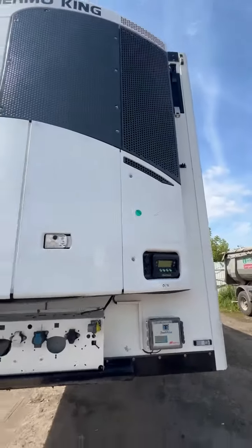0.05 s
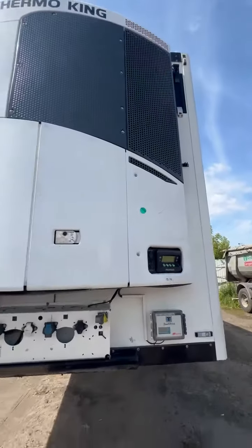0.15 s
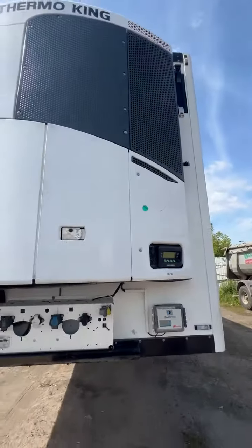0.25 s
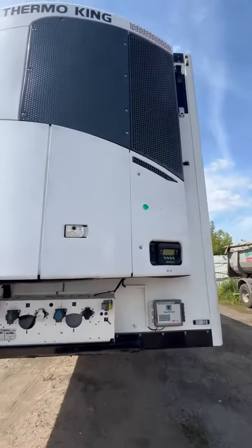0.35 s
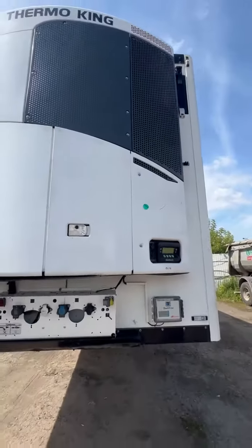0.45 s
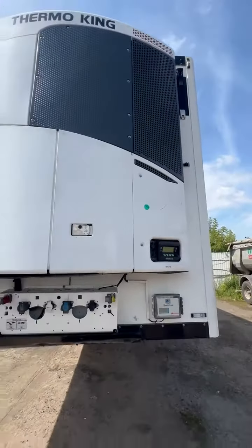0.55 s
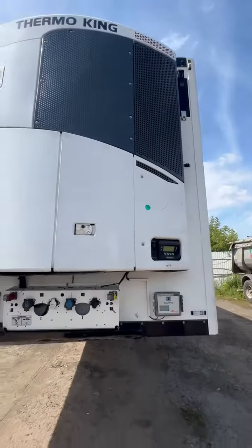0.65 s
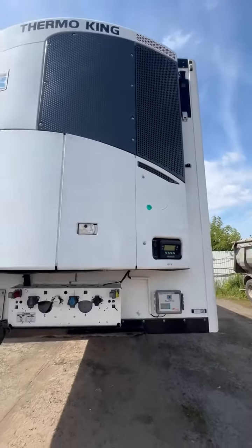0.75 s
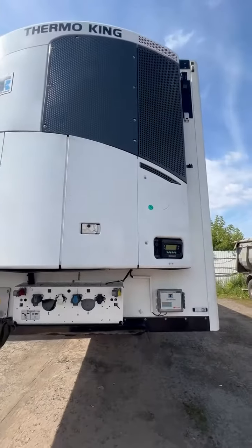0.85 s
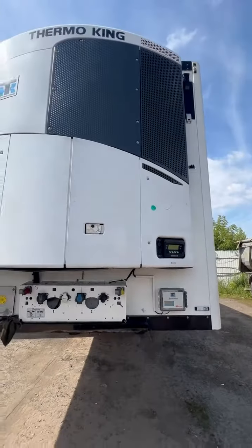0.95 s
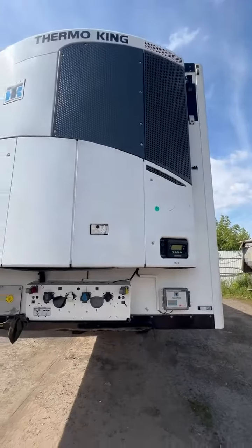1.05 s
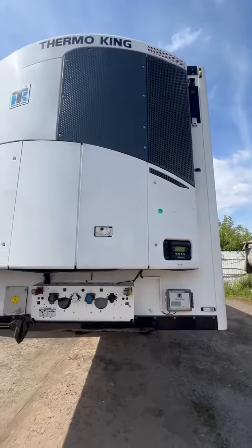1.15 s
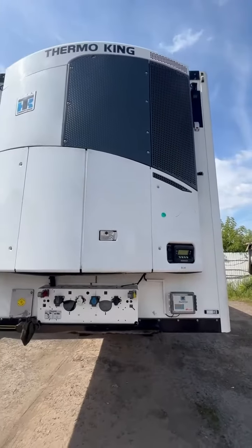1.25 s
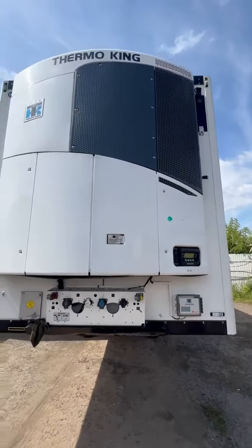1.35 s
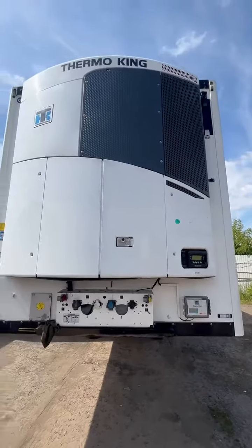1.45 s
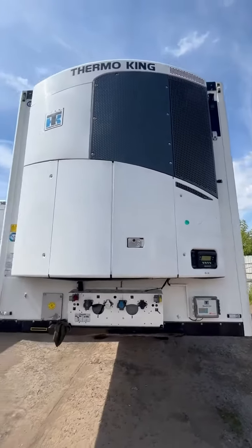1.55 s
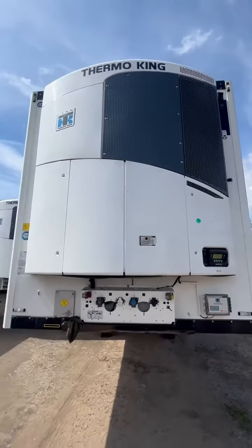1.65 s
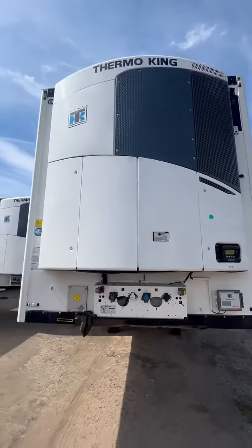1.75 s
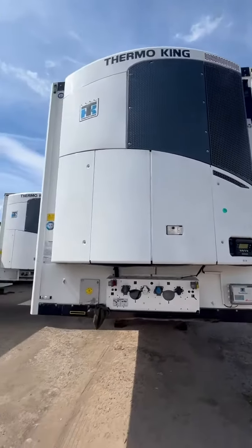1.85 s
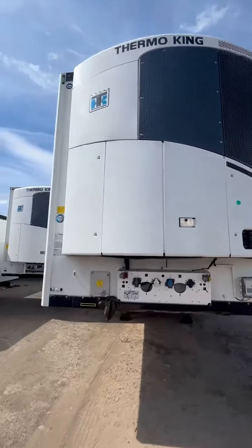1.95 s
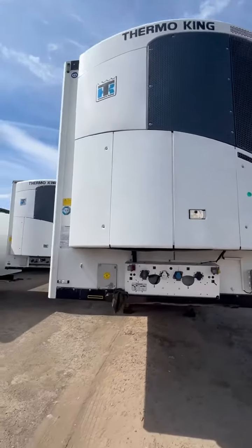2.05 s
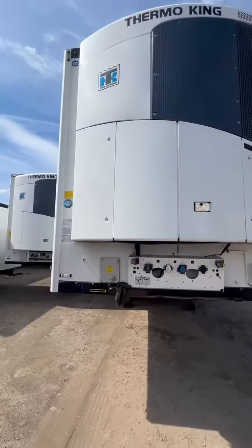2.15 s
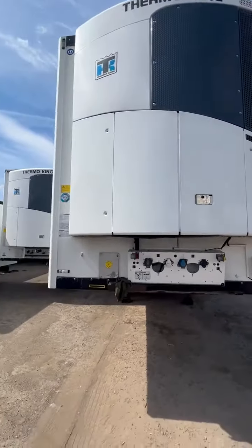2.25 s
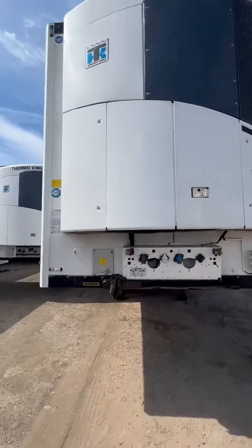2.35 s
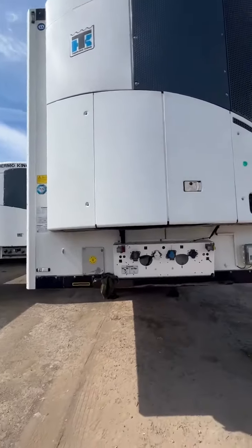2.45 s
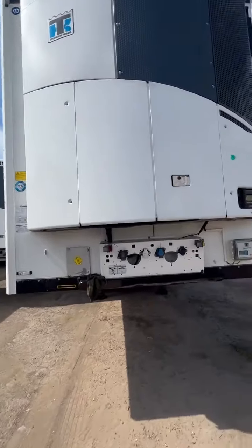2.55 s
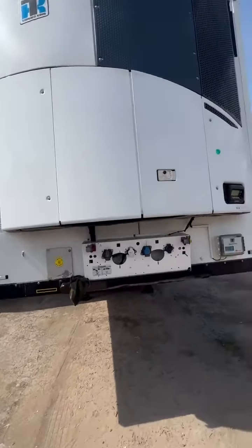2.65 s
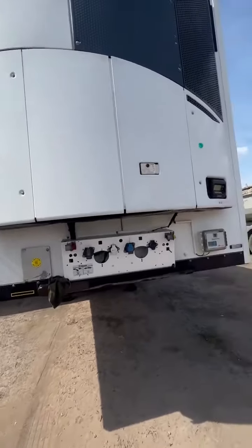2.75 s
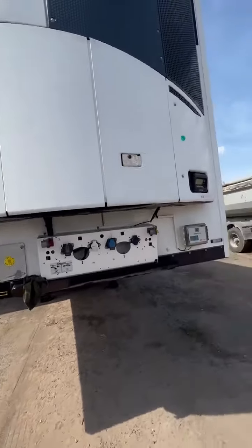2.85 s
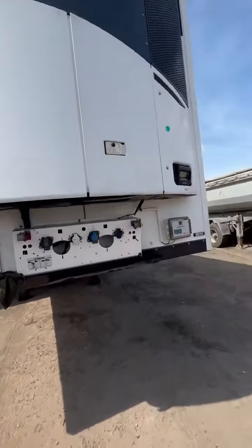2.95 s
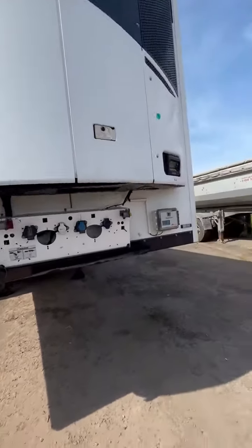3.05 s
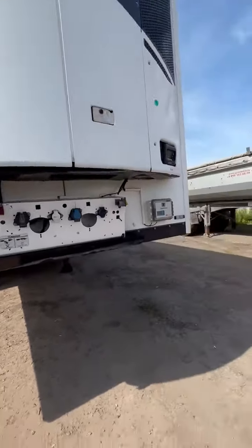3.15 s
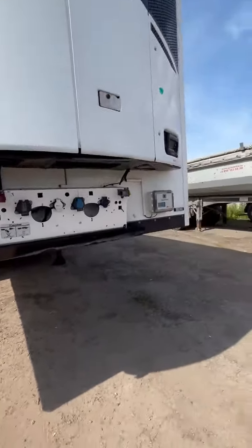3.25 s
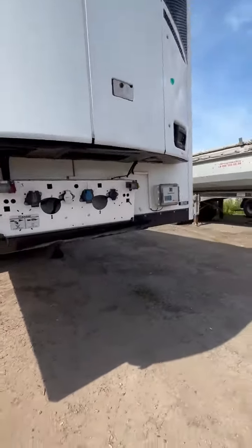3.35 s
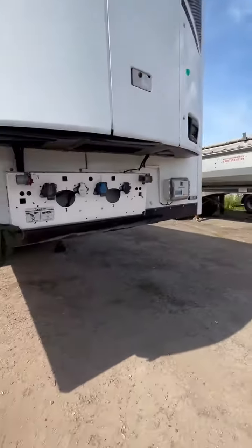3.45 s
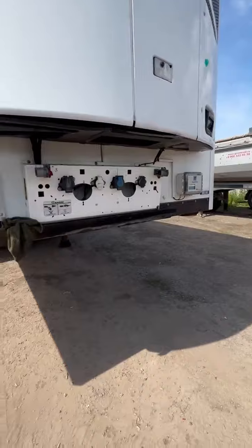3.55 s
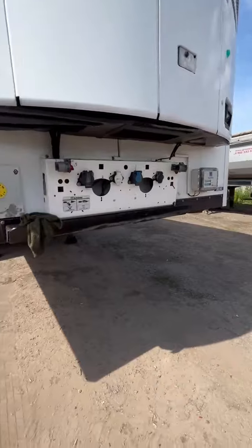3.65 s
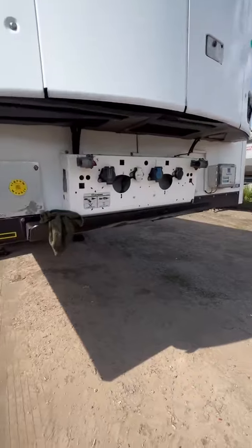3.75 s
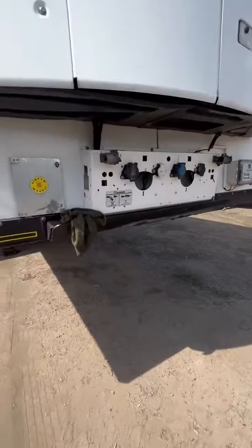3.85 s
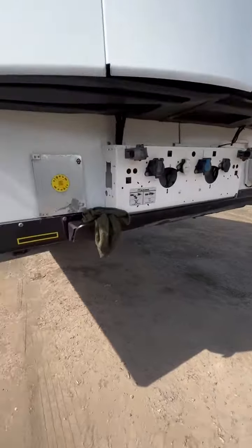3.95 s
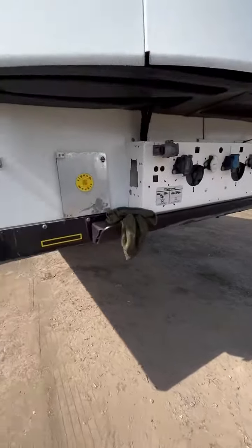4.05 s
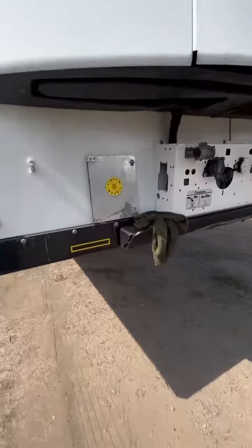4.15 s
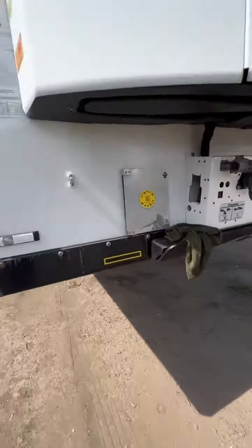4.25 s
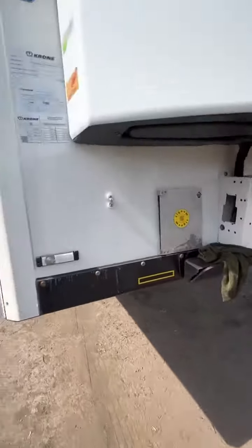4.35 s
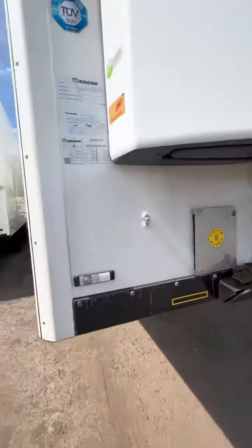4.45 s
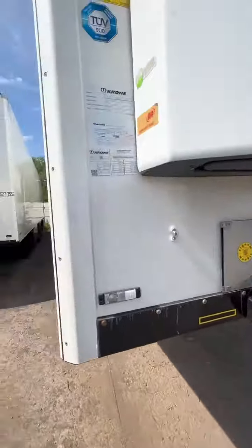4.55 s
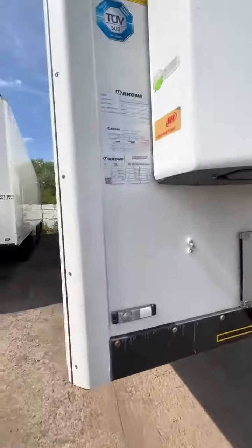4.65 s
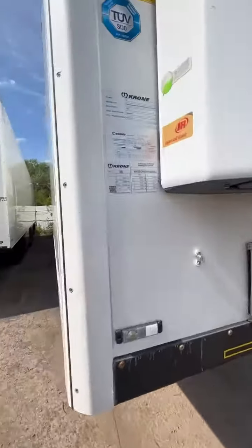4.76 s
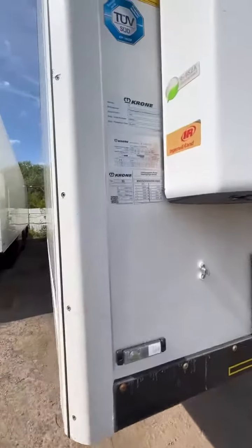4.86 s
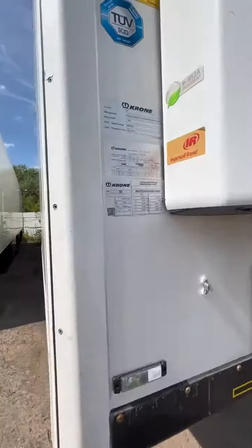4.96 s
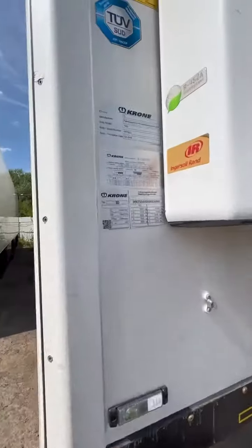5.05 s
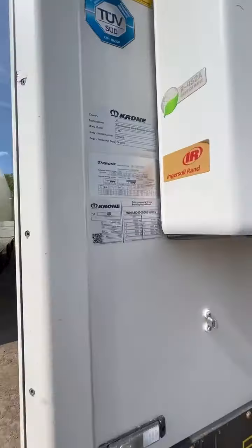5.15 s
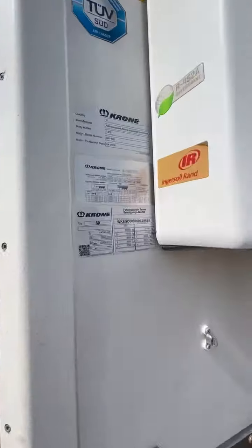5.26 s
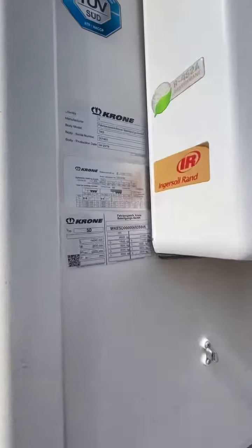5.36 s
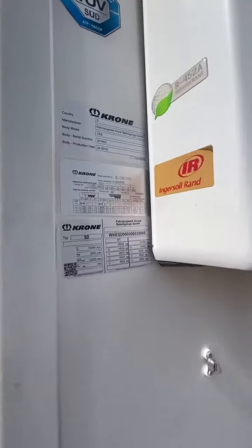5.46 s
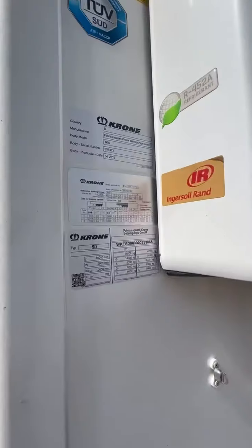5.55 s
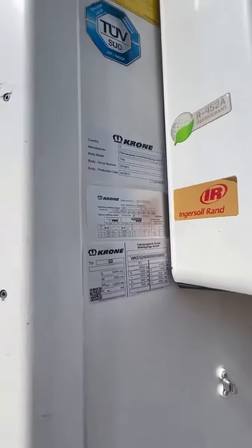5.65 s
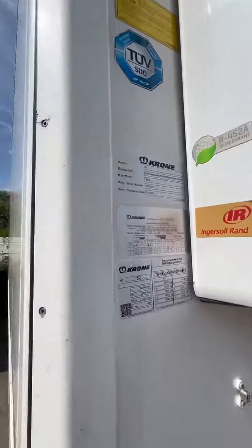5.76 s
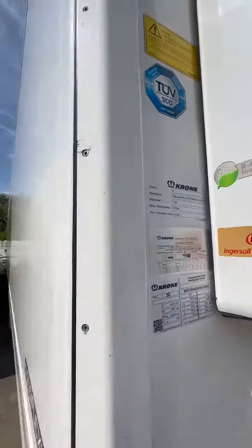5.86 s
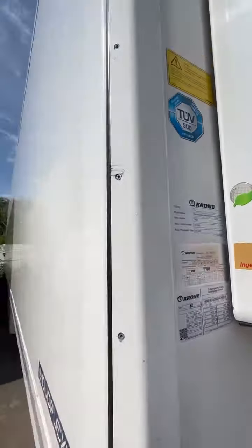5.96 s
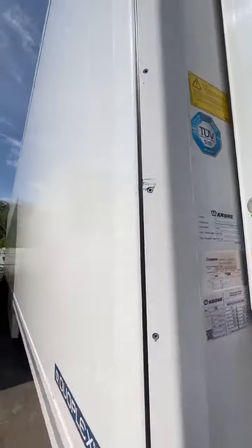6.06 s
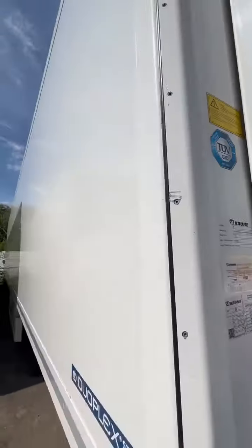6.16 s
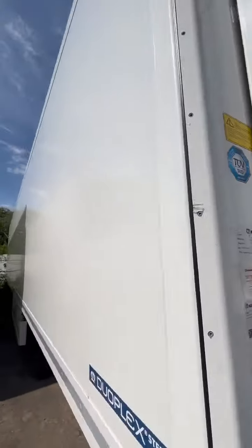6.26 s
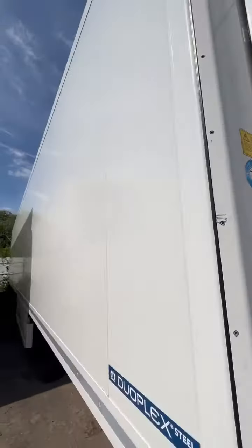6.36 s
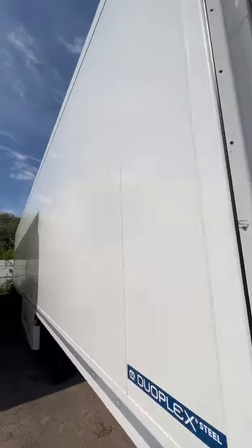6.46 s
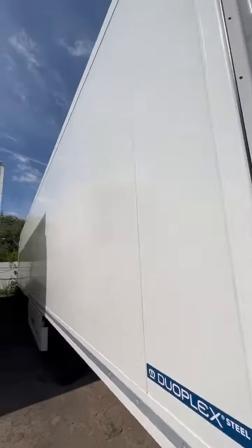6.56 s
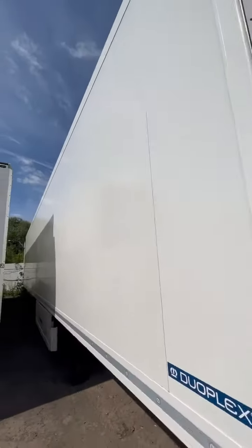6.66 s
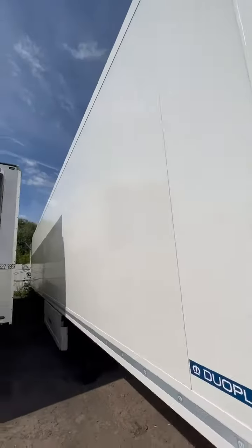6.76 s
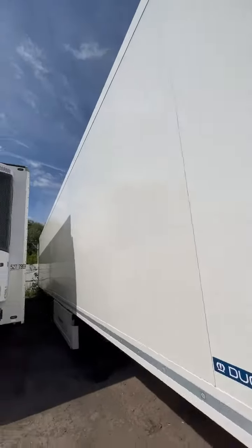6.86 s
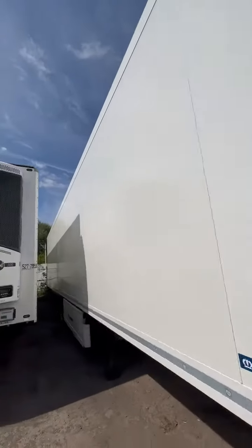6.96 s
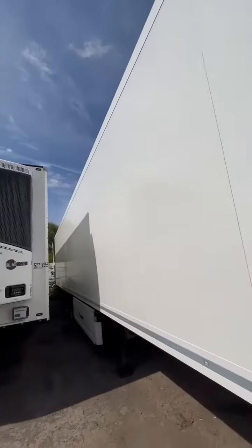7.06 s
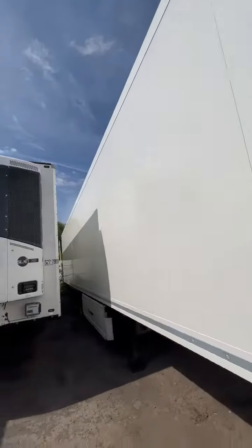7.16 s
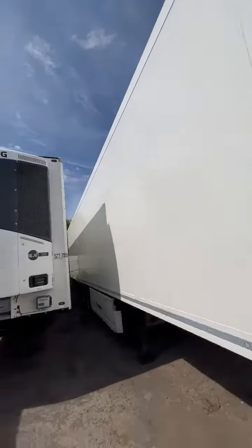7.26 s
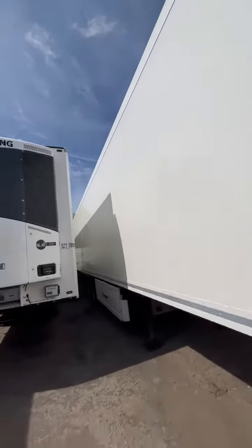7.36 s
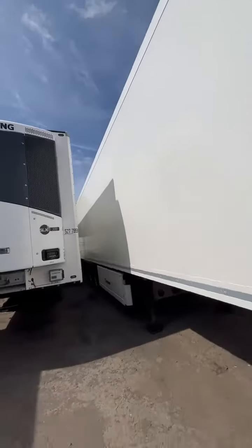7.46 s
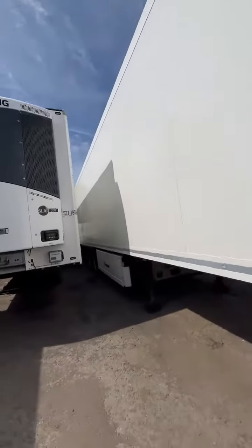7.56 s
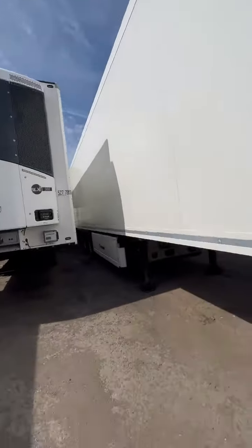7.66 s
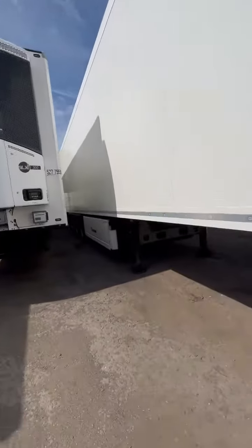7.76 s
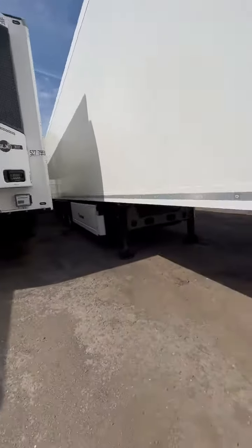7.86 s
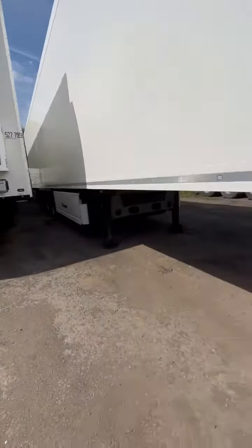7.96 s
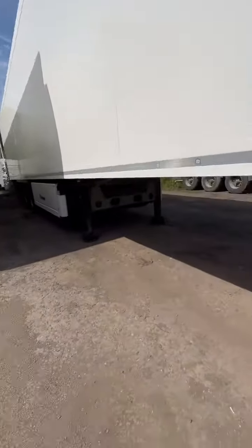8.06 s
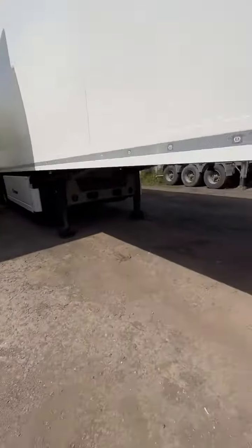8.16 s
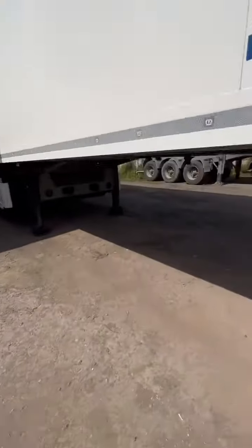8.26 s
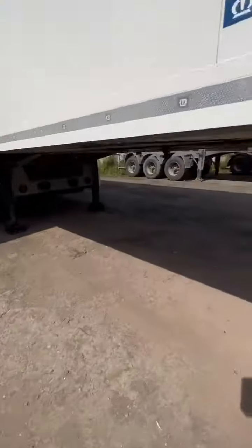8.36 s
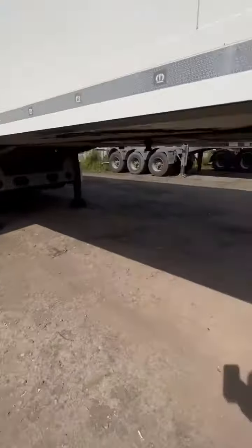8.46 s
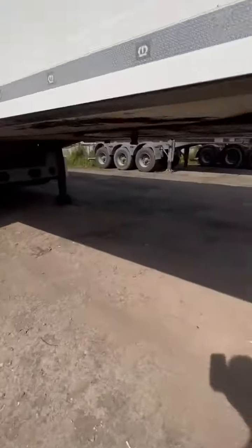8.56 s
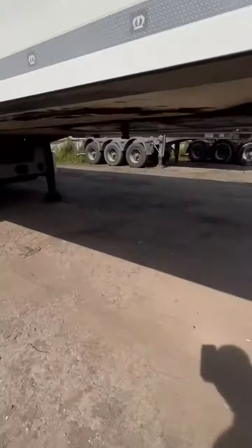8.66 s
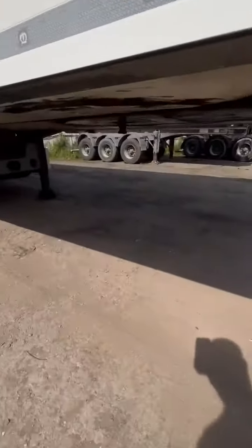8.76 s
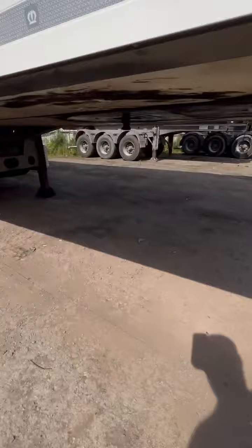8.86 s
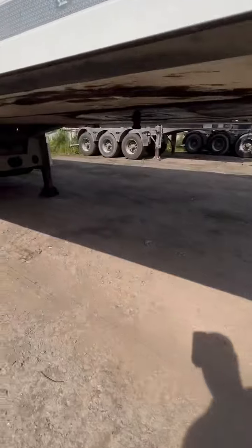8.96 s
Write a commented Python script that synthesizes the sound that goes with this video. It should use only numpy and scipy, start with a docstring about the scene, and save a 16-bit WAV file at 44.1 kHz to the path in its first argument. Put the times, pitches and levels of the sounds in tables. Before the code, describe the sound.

A small four-cylinder diesel runs continuously at constant speed, its low hum mixed with fast mechanical rattle, wavering fan tones and broad air noise. The walking listener comes close, hears it swell and buzz, then rounds the trailer's corner, where clatter and hiss fade into a muffled drone. Soft low wind puffs brush the close stereo microphone; sparse grit clicks come near the end.

```python
"""A gravel lot, walking up to a trailer refrigeration unit and then round the corner of the trailer.
Its four-cylinder diesel drones in sine orders of the firing rate; clatter and piston slaps are
noise that repeats with the engine cycle; fans add wavering tones and a filtered rush of air.
The corner shades the treble. A light breeze brushes the microphone as low noise, opposite
at its two ports, and grit ticks underfoot as short noise bursts."""
import sys
import numpy as np
from scipy import signal
from scipy.fft import rfft, irfft, next_fast_len
from scipy.io import wavfile
from scipy.ndimage import uniform_filter1d

SR = 44100
rng = np.random.default_rng(int(sys.argv[2]) if len(sys.argv) > 2 else 0)


def generate_wav(sig):
    """Save sig (samples, or channels by samples) to the path in sys.argv[1] as 16-bit PCM at SR."""
    pcm = np.round(np.clip(np.atleast_2d(sig).T, -1, 1) * 32767).astype(np.int16)
    wavfile.write(sys.argv[1], SR, pcm)


N = 397782
TIME = np.arange(N) / SR
EDGE_HZ = 11700  # top of the recorded band

# firing rate, nearly steady; the walk towards the unit and away bends it a little:
# (time [s], firings per second [Hz])
FIRING_RATE = [(0, 49.46), (1.8, 49.5), (3.0, 49.62), (4.5, 49.55), (5.1, 49.6), (5.8, 49.45), (6.8, 49.47),
               (7.8, 49.58), (9, 49.6)]
# boom of the housing along the walk, highest right beside the unit; used relative to its top, median
# or start: (time [s], level [dB])
BOOM_ALONG_WALK = [(0, -29.5), (0.8, -30.5), (1.7, -30.5), (2.9, -29), (3.8, -25), (4.4, -24), (4.9, -23.5),
                   (5.35, -20.5), (5.8, -22.5), (6.5, -27.5), (7, -30.5), (7.7, -34), (8.4, -34),
                   (9, -32.5)]
# treble, which needs a line of sight to the grille and is lost round the corner; used relative like
# the boom: (time [s], level [dB])
TREBLE_ALONG_WALK = [(0, -37), (1.5, -37), (2.4, -35.5), (3.1, -32.5), (4.4, -34.5), (5.65, -34),
                     (6.3, -39.5), (7.1, -46), (7.7, -49), (8.5, -47.5), (9, -48)]
# the unit is ahead on the left, narrows as the microphone passes the corner, then lies behind:
# (time [s], left-right difference [dB], share behind [0-1], width [dB])
UNIT_BEARING = [(0, 4, 0, 2), (3, 3.5, 0.14, -1), (5.6, 3, 0.5, -2), (6.2, 2.5, 0.06, -8),
                (6.65, 2, 0.2, -14), (7.1, 0, 0.8, -6), (7.5, 0.5, 1, 5.5), (9, 0.5, 0.96, 2)]


def drone(firings, level_db=0, unsteady_db=-0.05, even_lean=0.09, lean=0.19, pipe_lag=0.04):
    """Deep, clean exhaust orders from slightly uneven combustion; higher ones lean towards the unit."""
    # multiples of the firing rate: order [firings]
    exhaust_orders = (1, 2, 3, 4, 5, 6, 7, 9)
    # one row per order: (level beside the unit [dB], following [dB per dB of boom])
    exhaust_levels = [(-24, 0.57), (-13, 0.78), (-23, 0.79), (-22, 1.13), (-25.5, 1.45), (-24, 1.35),
                      (-28, 1.5), (-29, 1.5)]
    boom_db = below_top(BOOM_ALONG_WALK, TIME)
    side_db = leftward(TIME)
    out = np.zeros((2, N))
    for k, (db, following) in zip(exhaust_orders, exhaust_levels):
        order_db = level_db + db + following * boom_db + unsteady_db * drift(33)
        strength = standing(k) * gain_of(order_db)
        # dB each way per dB of left-right difference
        tilt = gain_of(side_db * (even_lean + lean * (k / exhaust_orders[-1]) ** 2))
        # the orders leave as one stroke; the silencer holds higher ones back (lag in firings per order)
        wave = np.sin(2 * np.pi * k * (firings - pipe_lag * k))
        out += np.array([tilt, 1 / tilt]) * strength * wave
    return np.sqrt(2) * out


def rush(firings, level_db=-34.0, knocking=0.63, patchy_db=1.65, flicker_db=1.17, flicker_hz=5500):
    """Valves and injectors repeat a clatter every four firings; fan air and combustion add fresh noise."""
    # engine and fans together, relative: (frequency [Hz], level [dB per Hz])
    rush_spectrum = [(290, -17), (500, -1), (610, -5.5), (730, -7.5), (980, -10.5), (1130, -8.5),
                     (1400, -14), (1620, -9.5), (1850, -9), (2300, -11.5), (2900, -13), (3350, -16),
                     (3650, -22), (4200, -21.5), (5200, -25.5), (5900, -22.5), (8000, -29), (9400, -31),
                     (11500, -38)]
    # part that repeats with each engine cycle: (frequency [Hz], share [0-1])
    repeating_share = [(600, 0.34), (1100, 0.62), (1900, 0.56), (3000, 0.52), (4500, 0.32), (9000, 0.44)]
    # air hiss, strongest just below the housing, relative to its top: (time [s], level [dB])
    hiss_along_walk = [(0, -46), (1.3, -46.5), (3.3, -44.5), (4.15, -43), (4.4, -47), (5.7, -47),
                       (6.4, -48.5), (7.1, -54.5), (7.7, -59), (9, -59.5)]
    # how far each range follows the walk:
    # (frequency [Hz], by boom [dB per dB], by treble [dB per dB], by hiss [dB per dB])
    range_following = [(450, 1, -0.5, 1), (734, 0.82, 0.66, -0.5), (1150, -0.09, 0.96, 0),
                       (1680, -0.2, 1.1, 0), (2160, 0.38, 0.86, -0.3), (3100, -0.1, 1.0, 0),
                       (4020, 0, 0.15, 0.52), (5840, 0, 0, 1.34), (11200, 0.72, 0, 0.5)]
    knock = knocks(firings)
    clatter = knock * cycling(firings)
    air = rng.standard_normal((2, N)) * evened(1 + knocking * (knock - 1))
    hz, t, (clatter, air) = spectra(scatter(np.array([clatter, air])))

    # eddies make the air uneven in patches, and its top flickers
    patches = uniform_filter1d(rng.standard_normal(air.shape[1:]), size=40, axis=0)
    patches = evened(uniform_filter1d(patches, size=6, axis=1))
    flicker = hz / flicker_hz * np.interp(t, TIME, drift(16))
    air = air * gain_of(patchy_db * patches + flicker_db * flicker)

    share = np.clip(across(repeating_share, hz)[0], 0, 1)
    mixed = np.sqrt(share) * clatter + np.sqrt(1 - share) * air
    mixed = mixed * gain_of(across(rush_spectrum, hz)[0])

    # distance and the corner change each range by its own amount; its mean power stays the same
    by_boom, by_treble, by_hiss = across(range_following, hz)
    reach_db = by_boom * below_top(BOOM_ALONG_WALK, t) + by_treble * below_top(TREBLE_ALONG_WALK, t)
    reach = gain_of(reach_db + by_hiss * below_top(hiss_along_walk, t))
    reach = reach / np.sqrt(np.mean(reach ** 2, axis=1, keepdims=True))
    return gain_of(level_db) * evened(waveform(mixed * reach * gain_of(colouring(hz, t))))


def knocks(firings, cylinder_db=(0.5, 2.5, -.5, -2.0), peak_at=0.53, spread=0.22, bed=3.0):
    """Each firing swells from a bed of gear noise (place, spread in firings); the cylinders differ."""
    strength = gain_of(cylinder_db)[firings.astype(int) % len(cylinder_db)]
    swell = np.exp(-.5 * ((firings % 1 - peak_at) / spread) ** 2)
    return evened(bed + strength * swell)


def cycling(firings, count=10):
    """Noise repeating every four firings; its pattern melts into the next, count times over the walk."""
    cycles = rng.standard_normal((2, count + 1, 3564))  # samples per engine cycle
    place = (firings / 4 % 1 * cycles.shape[-1]).astype(int)
    spot, onward = np.divmod(np.arange(N) * count, N)
    turn = np.pi / 2 * onward / N
    return np.cos(turn) * cycles[:, spot, place] + np.sin(turn) * cycles[:, spot + 1, place]


def scatter(x, spread_s=0.00394):
    """Each range finds its own way out of the housing, so a knock arrives spread in time."""
    hz = np.fft.rfftfreq(N, 1 / SR)
    paths_hz = np.geomspace(500, EDGE_HZ, 24)
    delay = np.interp(hz, paths_hz, spread_s * rng.standard_normal(len(paths_hz)))
    # the phase is the delay summed over frequency
    return irfft(rfft(x) * np.exp(-2j * np.pi * np.cumsum(delay) * hz[1]), N)


def colouring(hz, t, ripple_db=2.3):
    """Housing resonances and shifting reflections of ground and trailer colour the rush, in dB."""
    # housing and its openings, each heard best from one stretch of the walk:
    # (frequency [Hz], width [Hz], level [dB], clearest at [s], half span [s])
    housing_resonances = [(615, 160, 9.5, 8.05, 1.6), (710, 58, 4.5, 2.9, 0.32),
                          (780, 830, 6.5, 0.94, 1.28), (890, 180, 4, 5.8, 1.5), (1350, 220, 4.5, 5.5, 0.5),
                          (2660, 700, 2, 3, 0.44), (2030, 500, 1.5, 4.3, 0.68), (2360, 290, 0, 5.0, 0.87),
                          (2680, 520, 4, 8.58, 0.35), (2880, 220, 2.5, 2.4, 2.8), (3060, 240, 6, 5, 0.5),
                          (6100, 530, 5.5, 8.4, 1.1)]
    ringing = 0
    for f, width, db, s, span in housing_resonances:
        nearness = np.exp(-((t - s) / span) ** 2)
        ringing = ringing + db * nearness / (1 + (2 * (hz - f) / width) ** 2)
    ripple = rng.standard_normal((len(hz), len(t)))
    ripple = uniform_filter1d(uniform_filter1d(ripple, size=4, axis=0), size=70, axis=1)
    return ringing + ripple_db * evened(ripple)


def slaps(firings, level_db=-34.3, swell_s=0.0019, low_hz=1600, high_hz=1980, uneven_db=0.5,
          fresh=0.45, shading=1.5, receding=0.75):
    """Each piston slaps its liner once a cycle: a soft, even burst in the many close block modes."""
    # one row per piston: (place in the cycle [firings], level [dB])
    piston_slaps = [(0.17, -1), (1.13, 1.5), (2.15, -4), (3.2, -1.5)]
    firing_hz = along(FIRING_RATE, TIME)[0]
    envelope = 0
    for place, db in piston_slaps:
        age = (firings - place) % len(piston_slaps) / firing_hz / swell_s
        envelope = envelope + gain_of(db + uneven_db * drift(11)) * age * np.exp(1 - age)
    block = signal.butter(2, [low_hz, high_hz], "band", fs=SR, output="sos")
    modes = signal.sosfilt(block, cycling(firings)[0] + fresh * rng.standard_normal((2, N)))
    # only the phase is kept, so the burst is even
    phase = np.angle(signal.hilbert(modes, next_fast_len(N))[:, :N])
    rattle = evened(np.cos(phase))
    # a slap travels only straight, so the corner hides it sooner than the rush
    treble_db = below_top(TREBLE_ALONG_WALK, TIME)
    reach_db = shading * treble_db - receding * below_top(BOOM_ALONG_WALK, TIME)
    # never above its mean over the first second
    reach_db = np.minimum(reach_db - reach_db[:SR].mean(), 0)
    return gain_of(level_db + reach_db) * envelope * rattle


def buzz(firings, level_db=-16.5, fading_db=2.5, fading_hz=1.112, following=0.94, wander_rad=0.18):
    """Higher and half orders radiated by the housing, loudest close by; each swells, fades and wavers."""
    # multiples of the firing rate: order [firings]
    housing_orders = (2.5, 3.5, 4.5, 5.5, 6.5, 7.5, 8, 8.5, 9.5, 10, 11, 11.5, 12, 12.5, 13, 14, 14.5, 15,
                      16, 17, 19)
    # one per order, before the common level: level [dB]
    housing_levels = (-14.5, -23, -24, -12.5, -17, -14.5, -19, -18, -14.5, -21, -21, -28.5, -25, -28.5, -23,
                      -22.5, -29.5, -31, -30.5, -35, -32.5)
    lines = 0
    for k, db in zip(housing_orders, housing_levels):
        strength = standing(k) * gain_of(db + fading_db * drift(fading_hz))
        phase = 2 * np.pi * (k * firings + rng.random()) + wander_rad * drift(7)
        lines = lines + strength * np.cos(phase)
    return gain_of(level_db + following * below_top(BOOM_ALONG_WALK, TIME)) * lines


def fans(level_db=-30.5, fading_db=2.0, wander_rad=0.31, shading=0.95):
    """Tones of fan blades and belt drive, wavering slightly, shaded by the trailer like the treble."""
    # before the common level: (frequency [Hz], level [dB])
    blade_tones = [(252.6, 0.5), (433, -14), (505.2, -23)]
    tones = 0
    for hz, db in blade_tones:
        strength = gain_of(db + fading_db * drift(0.74))
        phase = 2 * np.pi * (hz * TIME + rng.random()) + wander_rad * drift(2)
        tones = tones + strength * np.cos(phase)
    return gain_of(level_db + shading * around_median(TREBLE_ALONG_WALK)) * tones


def wakes(level_db=-36.0, low_hz=222, high_hz=262, following=0.17):
    """Fan blade wakes: a hollow whoosh of air round the blade tone, which carries round the corner."""
    band = signal.butter(2, [low_hz, high_hz], "band", fs=SR, output="sos")
    whoosh = evened(signal.sosfilt(band, rng.standard_normal((2, N))))
    return gain_of(level_db + following * around_median(BOOM_ALONG_WALK)) * whoosh


def rumble(firings, level_db=-30.0, swell_db=0.26, following=0.63, throb=0.082):
    """Low turbulence of the air fans drive through the housing; it throbs with each exhaust stroke."""
    # turbulence, relative: (frequency [Hz], level [dB per Hz])
    turbulence = [(8, -1.5), (25, -6), (60, 1), (120, 2), (180, 0.5), (240, -4), (310, -3.5), (450, -7),
                  (550, -18), (750, -69)]
    shape = gain_of(across(turbulence, np.fft.rfftfreq(N, 1 / SR))[0])
    noise = irfft(rfft(rng.standard_normal((2, N))) * shape, N)
    strokes = 1 + throb * np.sin(2 * np.pi * firings)
    walk_db = following * around_median(BOOM_ALONG_WALK)
    return evened(noise * strokes) * gain_of(level_db + walk_db + swell_db * drift(6.7))


def grit(level_db=-3, decay_s=0.0018, low_hz=1200, high_hz=5500):
    """Small stones snap against each other under a shoe: short, decaying bursts of noise."""
    # before the common level, for the first 2 ms of each tick: (time [s], level [dB])
    stone_ticks = [(7.7034, -46), (7.9468, -49), (8.2294, -46), (8.9042, -42)]
    out = np.zeros((2, N))
    t = TIME[:SR // 20]
    band = signal.butter(2, [low_hz, min(high_hz, SR / 2 - 1)], "band", fs=SR, output="sos")
    for s, db in stone_ticks:
        tick = signal.sosfilt(band, rng.standard_normal((2, len(t))) * np.exp(-t / decay_s))
        tick = gain_of(db + level_db) * tick / tick[:, :SR // 500].std()
        part = out[:, round(s * SR):][:, :len(t)]
        part += tick[:, :part.shape[1]]
    return out


def breeze(level_db=-3.0, low_hz=45, high_hz=150, top_hz=600, light_db=-41, swell_db=7.0,
           windiest_s=4.8, spell_s=1.4):
    """Short eddies press on one microphone port and pull at the other; light ones fill a windy spell."""
    # strongest puffs, before the common level: (time [s], level [dB], length [s])
    puffs_on_mic = [(2.66, -31, 0.09), (2.913, -27, 0.068), (3.702, -39, 0.05), (4.145, -24, 0.13),
                    (4.898, -24, 0.11), (5.25, -31, 0.043), (5.55, -21, 0.067), (5.823, -17, 0.054),
                    (6.012, -21, 0.087), (7.106, -26, 0.068), (8.694, -38, 0.11), (8.95, -32, 0.1)]
    narrow = signal.butter(1, [low_hz, high_hz], "band", fs=SR, output="sos")
    wide = signal.butter(1, [low_hz / 2, top_hz], "band", fs=SR, output="sos")
    noise = evened(signal.sosfilt(np.vstack([narrow, wide]), rng.standard_normal(N)))
    puffs = sum(gain_of(db) * np.exp(-2 * ((TIME - s) / length) ** 2) for s, db, length in puffs_on_mic)
    spell = np.exp(-((TIME - windiest_s) / spell_s) ** 2)
    light = gain_of(light_db + swell_db * drift(6)) * spell
    eddies = gain_of(level_db) * (puffs + light) * noise
    return np.array([eddies, -eddies])


def standing(k):
    """Gain of order k as the walk crosses nodes and crests of its wave between trailer and ground."""
    # nodes (-) and crests (+): (time [s], order [firings], change of level [dB], half width [s])
    nodes_and_crests = [(1.2, 7, -30, 0.21), (2.3, 3, -5.5, 0.4), (3.2, 3, -2, 0.43), (2.2, 5.5, 7, 0.99),
                        (2.9, 4, -9, 0.77), (3, 7, 6.5, 1.17), (3.151, 5, -9, 0.29), (3.24, 6, -15, 0.66),
                        (3, 1, 3.5, 0.7), (3.3, 2, 1, 1.2), (3.27, 5.5, -15, 0.52), (3.98, 9, -12, 0.35),
                        (6.33, 12, 10.5, 0.36), (3.9, 9.5, -4, 0.2), (7.4, 9.5, -3, 0.45),
                        (6.2, 14, -13.5, 0.32), (6.55, 6, 4.5, 0.31), (6.9, 7, -21, 1.05),
                        (6.5, 7.5, 6, 0.6), (6.5, 5, -23, 1.8), (7.13, 4, -4, 0.46), (7.85, 2, -32, 1.15),
                        (8.2, 7, -11, 0.43), (7.7, 3, 4.5, 0.83), (8.35, 4, 6.5, 0.6), (8.64, 6, -19, 0.52),
                        (8.85, 1, 11, 0.9), (8.96, 2, 2.5, 0.4), (2.34, 9.5, -14, 0.6), (5.9, 9.5, 5, 0.46),
                        (7.77, 6, 9, 0.34), (3.97, 7, -25, 0.34), (4.56, 7, 3, 0.35), (4.26, 5, 2.5, 0.27),
                        (4.4, 9, 5, 0.25), (3.75, 7.5, -5, 0.25), (4.65, 7.5, -13, 0.32),
                        (9.06, 7, 10.5, 0.35), (8.8, 5, 6, 0.24), (0.51, 7.5, 4, 1.2), (5.1, 14, 4, 0.7),
                        (2.4, 7.5, -4, 0.6)]
    powers = [1 + (gain_of(db) ** 2 - 1) * np.exp(-((TIME - s) / width) ** 2)
              for s, order, db, width in nodes_and_crests if round(2 * order) == 2 * k]
    return np.sqrt(np.prod(powers, axis=0))


def ports(pair, narrowing_hz=1200, mono_below_hz=280):
    """Two unrelated versions become left and right; the image swings as the microphone passes the unit."""
    # unit in front: (frequency [Hz], likeness [0-1], phase lead of left [rad], share of left-right dB [1])
    mic_in_front = [(25, 1, 1, 4), (220, 0.91, 0, -1), (308, 0.9, 0.15, 1.6), (420, 0.85, 1.3, 2),
                    (583, 0.6, 0.1, 1.9), (697, 0.66, 3, 2), (905, 0.4, -2, 2.5), (1370, 0.62, -1.5, 0.5),
                    (1840, 0.87, 0.5, 0), (2170, 0.03, 0.3, -0.64), (2940, 0.17, -2.5, 0),
                    (3330, 0.5, -1, 0), (3900, 1, -1.5, -0.5), (4720, 0.4, -0.9, 0.9),
                    (5400, 0.43, 3.5, -0.3), (6440, 0.34, 0.7, 0.5), (7700, 1, -4, -0.5),
                    (9100, 0.5, -1, -0.2)]
    # unit behind: (frequency [Hz], likeness [0-1], phase lead of left [rad])
    mic_behind = [(260, 1, -1), (430, 1, 0.5), (603, 0.38, -0.1), (827, 0.22, 2), (1190, 0.43, 2.5),
                  (1900, 0.87, 0.5), (2760, 0.05, -1), (3900, 1, 0), (4940, 0.4, 1.5), (5960, 0.9, 4.5),
                  (7800, 1, 0.5), (9200, 0.6, -1)]
    hz, t, (one, other) = spectra(pair)
    left_db, behind, width_db = along(UNIT_BEARING, t)
    behind = np.clip(behind, 0, 1)
    blend = (1 - behind) * likeness(mic_in_front, hz) + behind * likeness(mic_behind, hz)
    like, lead = np.minimum(abs(blend), 1), np.angle(blend)
    tilt = gain_of(across(mic_in_front, hz)[-1] * left_db / 2)
    common, apart = np.sqrt((1 + like) / 2) * one, np.sqrt((1 - like) / 2) * other
    left = (common + apart) * tilt
    right = (common - apart) / tilt * np.exp(-1j * lead)
    # dividing by the expected size of the sum keeps the spectrum of the middle
    centre = np.sqrt(tilt ** 2 + tilt ** -2 + 2 * like * np.cos(lead))
    mid, side = (left + right) / centre, (left - right) / centre
    # the width setting acts mostly on the lower range
    side = side * gain_of(width_db / (1 + (hz / narrowing_hz) ** 2))
    # long waves reach both ports alike
    side = side * hz ** 4 / np.hypot(hz ** 4, mono_below_hz ** 4)
    return waveform(np.array([mid + side, mid - side]))


def likeness(rows, hz):
    """Likeness and phase lead of the two ports as one complex number for each frequency."""
    f, like, lead = np.transpose(rows)[:3]
    return np.interp(np.log(hz + 1), np.log(f + 1), np.clip(like, 0, 1) * np.exp(1j * lead))


def leftward(t):
    """Left-right dB of the unit along the walk."""
    return along(UNIT_BEARING, t)[0]


def below_top(curve, t):
    """A level curve at the times t, in dB against its highest point there."""
    db = along(curve, t)[0]
    return db - db.max()


def around_median(curve):
    """A level curve along the whole walk, in dB against its median."""
    db = along(curve, TIME)[0]
    return db - np.median(db)


def gain_of(db):
    """Decibels to amplitude."""
    return 10 ** (np.asarray(db) / 20)


def evened(x):
    """Scales to rms 1."""
    return x / np.sqrt(np.mean(abs(x) ** 2) + 1e-20)


def along(rows, t):
    """Every column of a curve table at the times t."""
    s, *columns = np.transpose(rows)
    return [np.interp(t, s, c) for c in columns]


def across(rows, hz):
    """Every column of a spectrum table at the frequencies hz, interpolated on a log scale."""
    f, *columns = np.transpose(rows)
    return [np.interp(np.log(hz + 1), np.log(f + 1), c) for c in columns]


def drift(rate_hz):
    """Slow chance of rms 1: twelve sines, none faster than the rate."""
    t = TIME[::200]
    rates = rate_hz * rng.uniform(0.0971, 1, size=12)
    sines = sum(np.sin(2 * np.pi * (f * t + rng.random())) for f in rates)
    return np.interp(TIME, t, evened(sines))


def spectra(x):
    """Short-time spectra: Hz as a column, frame times, values."""
    hz, t, z = signal.stft(x, SR, nperseg=2048, noverlap=1536)
    return hz[:, None], t, z


def waveform(z):
    """Short-time spectra back to sound."""
    return signal.istft(z, SR, nperseg=2048, noverlap=1536)[1][..., :N]


def scene():
    """One crankshaft drives every engine layer; breeze and grit are close to the microphone."""
    firings = np.cumsum(along(FIRING_RATE, TIME)[0]) / SR
    tones = np.array([buzz(firings) + fans() for _ in range(2)])
    housing = ports(tones + wakes() + rumble(firings) + rush(firings))
    return drone(firings) + housing + slaps(firings) + breeze() + grit()


def record(dry):
    """The band limit of the recorder: a steep low-pass."""
    low_pass = signal.firwin(1023, EDGE_HZ, window=("kaiser", 10), fs=SR)
    return signal.oaconvolve(dry, low_pass[None], "same")


dry = scene()
out = record(dry)
generate_wav(out)
```